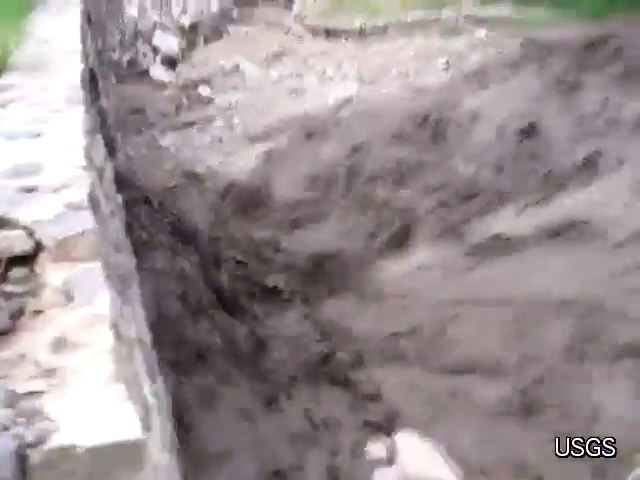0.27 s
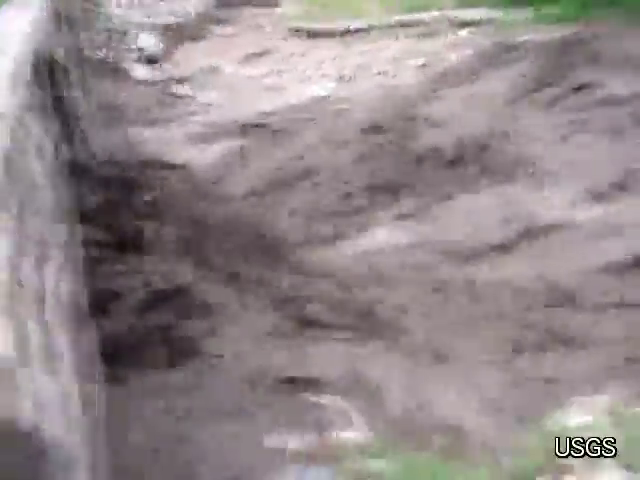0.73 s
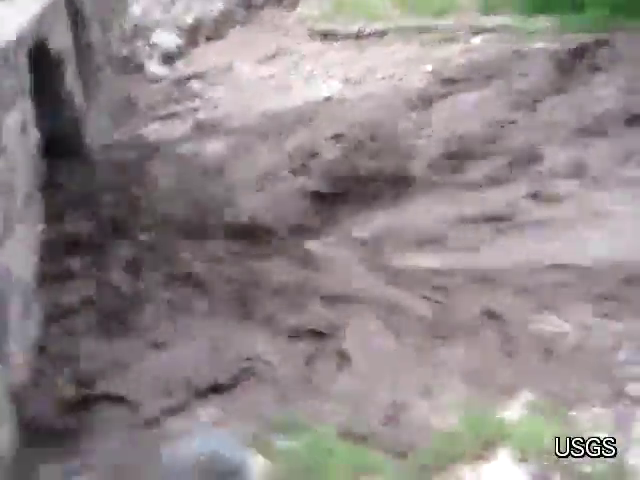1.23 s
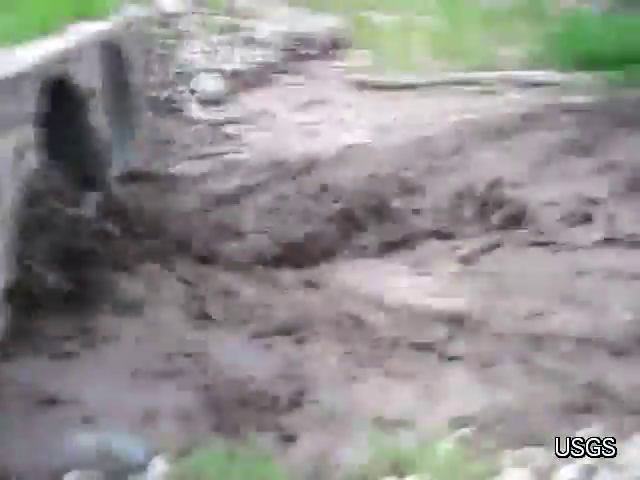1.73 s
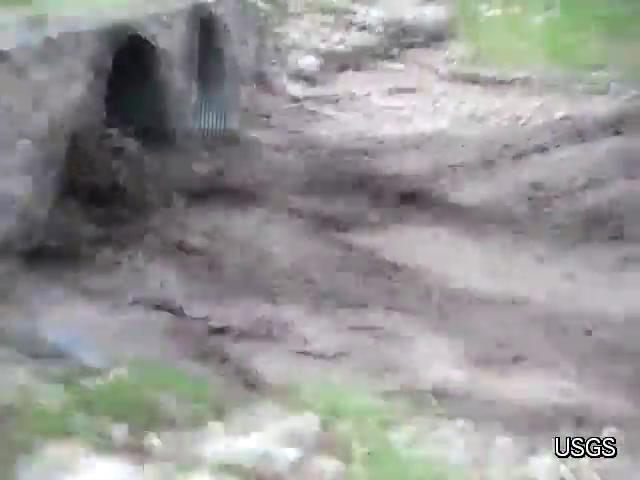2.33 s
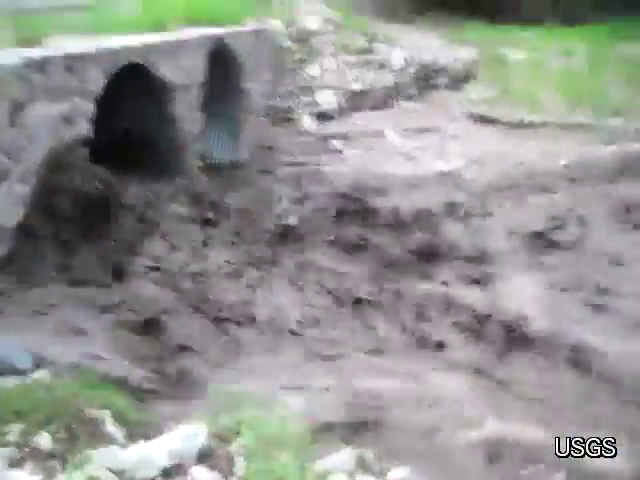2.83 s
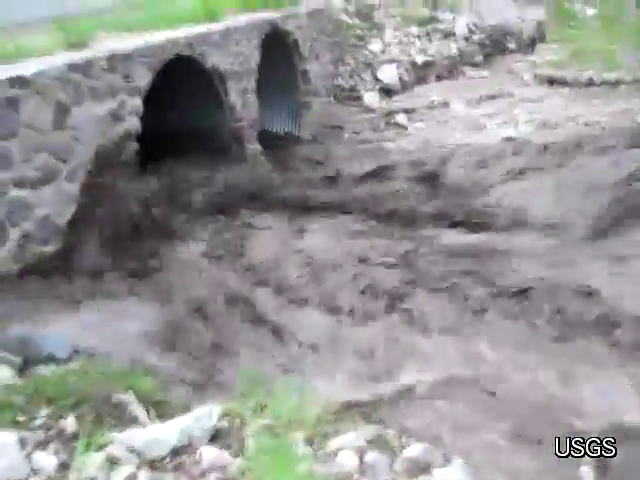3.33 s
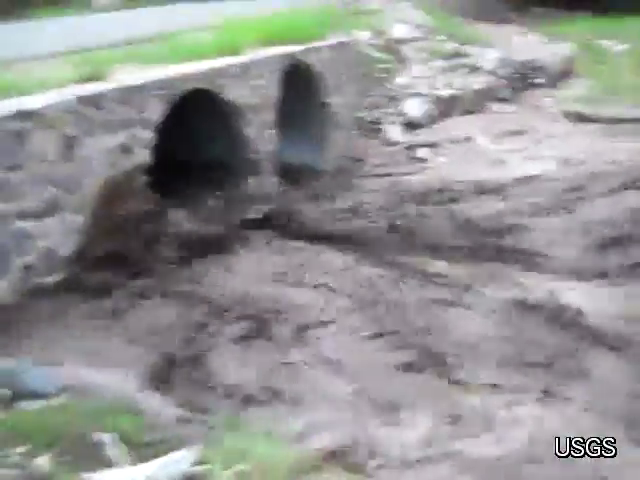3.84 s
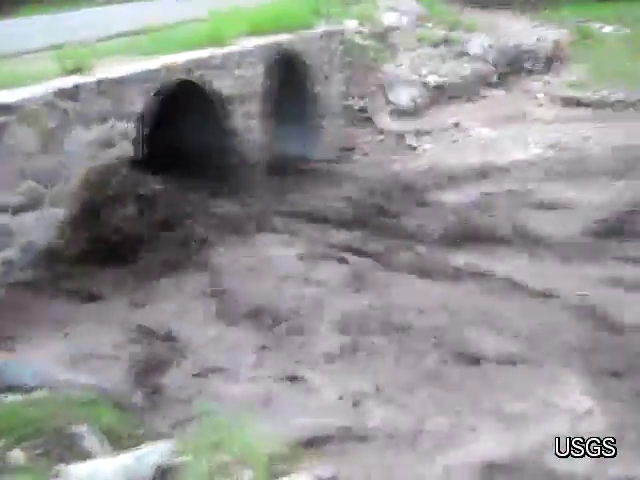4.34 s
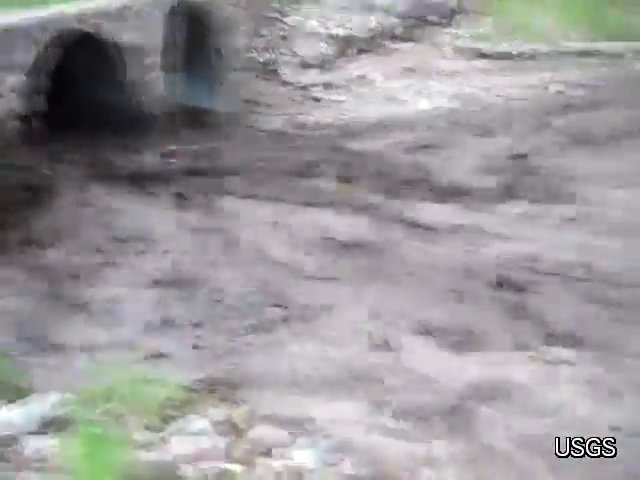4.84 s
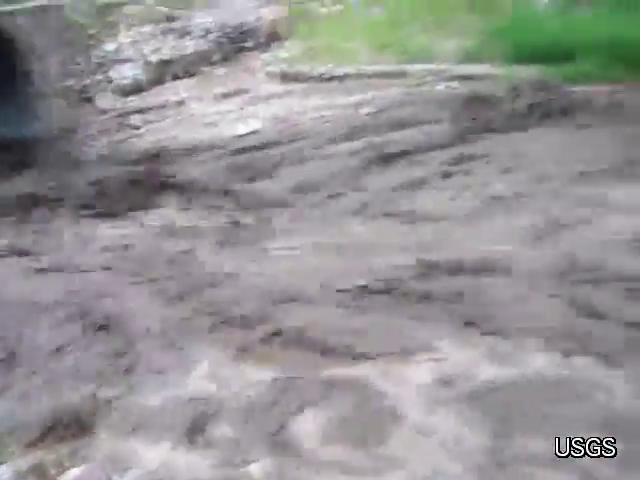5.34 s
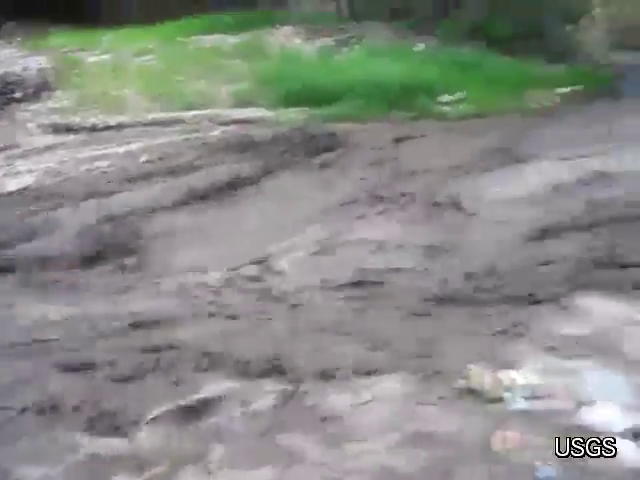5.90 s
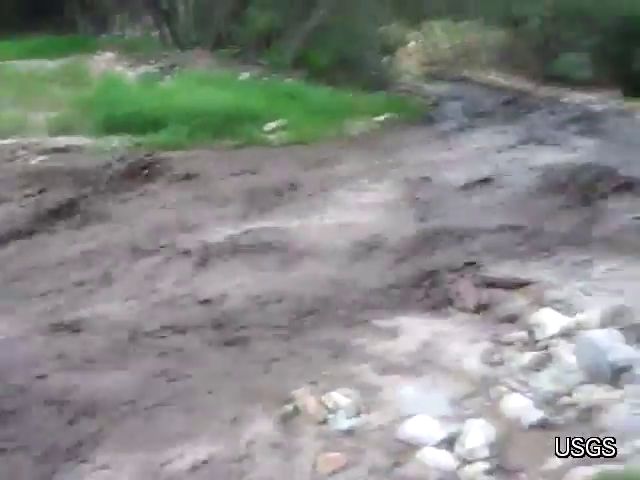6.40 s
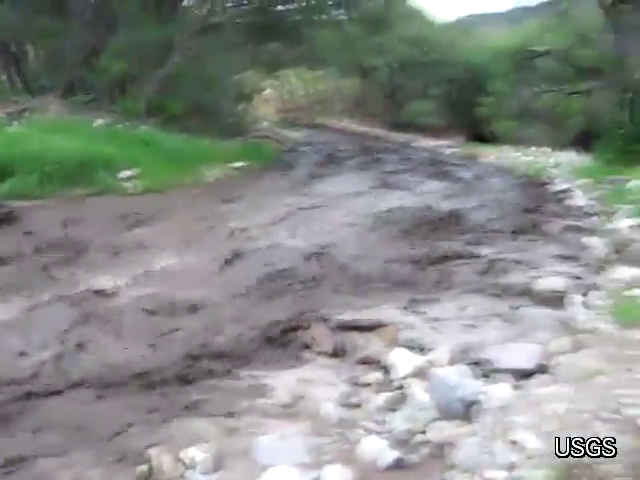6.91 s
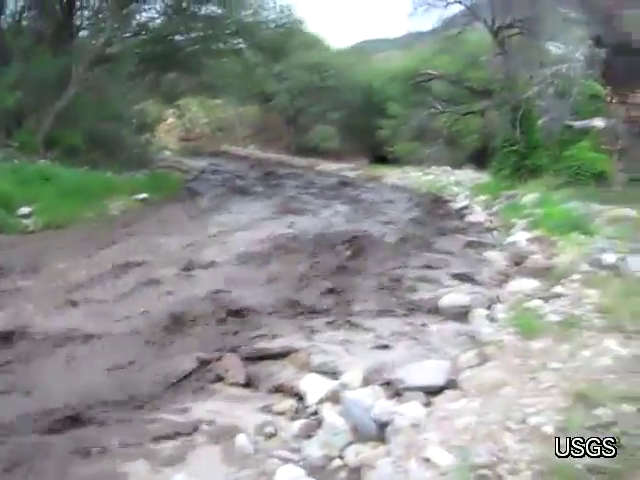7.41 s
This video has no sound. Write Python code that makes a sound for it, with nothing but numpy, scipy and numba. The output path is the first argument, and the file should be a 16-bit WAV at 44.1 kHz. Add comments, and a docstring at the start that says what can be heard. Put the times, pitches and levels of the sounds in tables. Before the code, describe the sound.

A thick, muddy flash flood roars close by past a stone wall, with dull boulder thumps, small glugs and gritty crackle.

```python
"""A thick muddy roar fills the ear at once: a flash flood pouring past a stone wall with culverts.
Half-octave families of random bubble pops and noise make it, from deep roar to hiss and spray.
The wall's echo hollows out two sliding bands, and the culvert mouths ring early on.
Boulders thump as short low rings, air pockets glug as brief tones, flung grit crackles as noise bursts.
A small camera pans downstream; its gain control ducks peaks and its coarse sampling mirrors treble."""
import sys
import numpy as np
from scipy import signal
from scipy.fft import rfft, irfft, next_fast_len
from scipy.io import wavfile
from scipy.ndimage import uniform_filter1d
from numba import njit

SR = 44100
rng = np.random.default_rng(int(sys.argv[2]) if len(sys.argv) > 2 else 0)


def wrap_up_sound(samples):
    """Save the sound to the file named by the first command line argument, as 16-bit audio."""
    columns = np.atleast_2d(samples).T
    # keep every value between -1 and 1, then stretch to whole-number steps
    tamed = np.clip(columns, -1, 1)
    steps = np.round(tamed * 32767).astype(np.int16)
    wavfile.write(sys.argv[1], SR, steps)


N = 337806  # samples

# tone colour of the torrent: f/Hz, relative level per Hz/dB
WATER_COLOUR = [(18, -49.5), (30, -25.5), (60, -11.5), (95, -3.5), (130, -1), (180, 0.5), (258, -1),
                (447, -6), (655, -6), (870, -10), (1010, -10.5), (1140, -13), (2000, -16), (3100, -18),
                (3600, -19), (4130, -21), (4770, -24.5), (5400, -30), (6200, -47.5), (20000, -120)]
# borders of the registers wind, deep, rumble, body, roar, wash, splash, hiss, spray: f/Hz
REGISTER_EDGES = (70, 140, 220, 400, 600, 850, 1200, 3500)
# slow level of the lower registers, each about its own mean:
# t/s, wind buffeting level/dB, rumble level/dB, body level/dB, roar level/dB, wash level/dB, splash level/dB
LOW_LEVELS = [(0, 0, 0.5, -0.5, 0, 1, 0), (.5, -1.5, -2, 0.5, -2.5, -1, -1),
              (.9, 0.5, -2.5, -2, -1.5, -0.5, -1), (1.5, -3, -2, 0.5, -3, 0.5, 1),
              (2.0, -2, 1, 0.5, -2.5, -1, -1.5), (2.5, -1.5, 1.5, 0.5, -0.5, 1, -1),
              (2.9, -2.5, -2.5, -2.5, 1, 1, -1.5), (3.8, -2, 0, -1.5, -0.5, 0, 2.5),
              (4.3, -1.5, -0.5, 0.5, 1, 2, -1), (4.8, -0.5, -1, 0.5, 1.5, 0, 0),
              (5.1, -3, -0.5, 0, -1.5, 0, -1), (5.5, 4, 0, 1, 3.5, -0.5, 1.5), (5.9, 0, 1, 0.5, 1, 1, -1),
              (6.3, -1.5, -2, 1.5, 2, 2, 2), (6.7, 2.5, -1.5, 2, 2.5, .5, 3),
              (7.0, 1.5, -2, 2.5, 3.5, 3, 3), (7.3, 5.5, 4.5, 2.5, 4.5, 0, 2.5),
              (7.66, 6, -5, 1, 2, 1, 0.5)]
# slow level of the deepest roar, about its mean: t/s, level/dB
DEEP_LEVEL = [(0, 1.5), (.8, -1), (1.6, -1.5), (2.5, 1), (3.5, -1.5), (4.5, -.5), (5.2, 0), (5.8, .5),
              (6.5, -1), (7.66, 2.5)]
# quick swells and drops of the treble level:
# t/s, change before/dB (negative dips), drop after/dB (negative lifts)
TREBLE_CHANGES = [(0.2, -0.5, -1), (0.65, -1.5, 3), (0.92, 1.5, 6), (1.06, 0.5, -1.5), (1.14, 1, 1.5),
                  (1.46, 1.5, -2.5), (1.63, 0.5, 1.5), (1.745, 2, 3), (2.1, -0.5, 1.5), (2.23, 3.5, 1),
                  (2.44, 0.5, 2.5), (2.56, 4, -1), (2.92, -1, 0), (3.06, 3.5, 5.5), (3.25, 1.5, 1),
                  (3.7, 1, 6), (3.88, 1, 9), (4.12, 1.5, 3.5), (4.43, 1, 3.5), (4.64, 3.5, 2), (5.19, 1, 1),
                  (5.26, 2, 2), (5.61, 1, 3.5), (5.73, 0, -2), (5.85, 4.5, 2.5), (6.14, 3, 5), (6.33, 3, 0),
                  (6.58, 1, 4), (6.8, -2, 0.5), (7.28, -1.5, 4.5), (7.52, 2.5, 1.5)]
# bands the wall's echo cancels: t/s, lower f/Hz, lower depth/0-1, upper f/Hz, upper depth/0-1
WALL_DIPS = [(0, 230, 0.4, 880, .75), (.2, 242, 0.35, 920, 0.5), (.6, 260, 0.55, 1010, 0.25),
             (.85, 430, .3, 1100, 0.3), (1.2, 507, 0.43, 1130, 0.4), (1.5, 537, 0.6, 1050, 0),
             (1.9, 510, 0.6, 1010, 0.1), (2.1, 400, 0.74, 1050, 0.2), (2.35, 440, 0.33, 1050, .2),
             (2.55, 470, 0.7, 1050, .2), (2.85, 500, 0.56, 1000, 0), (3.1, 406, .25, 890, 0.4),
             (3.9, 360, 0.14, 880, 0.5), (4.2, 330, .3, 850, 0.3), (4.9, 230, 0.3, 800, 0.2),
             (5.2, 130, 0.28, 800, 0), (5.5, 130, 0, 800, 0.1)]
# boulder thumps at set times: t/s, peak level/dB, f/Hz
TIMED_THUMPS = [(0.19, -15.5, 188), (0.648, -14, 217), (1.051, -19, 199), (1.294, -14, 187),
                (1.363, -14.5, 178), (1.494, -16, 258), (1.611, -11, 228), (1.717, -13, 144),
                (1.908, -14.5, 240), (2.096, -13, 208), (2.373, -14.5, 170), (2.782, -17, 140),
                (2.932, -10.5, 211), (3.006, -18, 250), (3.318, -19, 252), (3.59, -19, 249),
                (3.27, -18.5, 204), (3.69, -17, 190), (4.226, -17, 146), (4.691, -18, 148),
                (4.705, -19, 240), (4.877, -15, 156), (5.205, -17, 217), (5.268, -13, 188),
                (5.35, -14.5, 201), (5.411, -27, 197), (5.465, -14, 254), (5.53, -14.5, 185),
                (5.585, -20, 215), (5.749, -12, 192), (5.846, -11.5, 175), (5.998, -19, 190),
                (6.12, -15, 140), (6.16, -14, 191), (6.366, -13.5, 158), (6.592, -14, 170),
                (6.96, -17, 260), (6.996, -15, 190), (7.228, -20, 205), (7.29, -13, 170), (7.392, -13, 258),
                (7.51, -11.5, 210)]
# glugs of trapped air: t/s, peak level/dB, f/Hz, length/s, pitch rise/share of f (negative falls)
AIR_GLUGS = [(0.025, -24, 542, 0.036, 0.047), (0.304, -21.5, 707, .04, 0.005),
             (0.624, -24, 602, .035, 0.13), (0.786, -25, 921, 0.05, 0.034), (0.89, -28, 978, 0.12, 0.033),
             (1.035, -23, 331, 0.056, 0.041), (1.075, -27, 709, .07, 0.22), (2.089, -23, 597, 0.027, 0.085),
             (2.545, -23.5, 766, 0.037, 0.067), (3.948, -24.5, 400, .035, .03),
             (3.555, -19.5, 514, 0.037, 0.0022), (5.14, -18.5, 560, 0.031, .03),
             (5.6, -17.5, 532, 0.025, 0.12), (5.393, -20.5, 352, 0.056, 0.086),
             (6.011, -25, 944, 0.052, .03), (6.257, -25, 1050, .05, -0.025), (6.471, -26, 583, .035, .03),
             (6.69, -22.5, 542, 0.044, 0.01), (6.85, -18.5, 474, 0.047, .03), (7.15, -25, 501, .05, 0.021),
             (7.582, -26, 569, 0.034, 0.046)]
# playback smoothing, loose enough to pass mirrored treble: f/Hz, level/dB
PLAYBACK_SMOOTHING = [(5000, 0), (5500, -1.5), (6000, -7), (6500, -14), (7880, -31.5), (9090, -48.5),
                      (10000, -63.5), (10800, -90), (20000, -130)]

WATER_DB = -21  # torrent level before its slow levels
CHURN_DB, CHURN_PER_S = 0.52, 9  # the whole torrent heaves together
BEFORE_S, SWITCH_S, AFTER_S = 0.055, 0.014, 0.029  # time constants of the quick treble changes
# turning downstream, away from the wall: the hiss lifts and the spray dulls by this much at full turn
TURN_FROM_S, TURN_TO_S, TURN_HISS_DB, TURN_SPRAY_DB = 4.3, 9.3, 0.4, -0.5
LOWER_DIP_WIDTH_HZ, UPPER_DIP_WIDTH_HZ = 156.0, 110.0
CULVERT_HZ, CULVERT_WIDTH_HZ = 690.0, 220.0
CULVERT_RING, CULVERT_UNTIL_S, CULVERT_FADE_S = 0.14, 2.5, 0.1  # ring share while the mouths are faced
THUMP_T60_S, THUMP_RISE_S = 0.034, 0.013
# further thumps at random times
RANDOM_THUMP_DB, RANDOM_SCATTER_DB, RANDOM_LOW_HZ, RANDOM_HIGH_HZ = -20, 4, 153.4, 273
GLUG_LATE = 1.34  # above 1 the tone is loudest late in its length
CRACKLE_DB, CRACKLE_PER_S, CRACKLE_SCATTER_DB, CRACKLE_DECAY_S = -40, 260, 2.5, 0.0015
CRACKLE_HZ, CRACKLE_WIDTH_HZ = 2690.0, 2330.0
AGC_INPUT_DB, AGC_TOP, AGC_RATIO = 1.5, 0.18, 3.3  # input gain, threshold amplitude, compression ratio
AGC_ATTACK_S, AGC_RELEASE_S = 0.0029, 0.072
CEILING, OFFSET = 0.94, -0.0151  # full-scale amplitudes
SAMPLE_STEP, TOP_HZ = 4, 11000  # the camera keeps every fourth sample


def water():
    """Half-octave families of bubbles; the treble wavers together and each family flickers alone."""
    quick_db = treble_changes()
    wind_db, rumble_db, body_db, roar_db, wash_db, splash_db = curve(LOW_LEVELS)
    deep_db = curve(DEEP_LEVEL)[0]
    turn = np.interp(np.arange(N) / SR, [TURN_FROM_S, TURN_TO_S], [0, 1])

    size = next_fast_len(N)
    octave = np.log2(np.maximum(np.arange(size // 2 + 1) * SR / size, 1.0))
    colour_hz, colour_db = np.transpose(WATER_COLOUR)
    colour = undb(np.interp(octave, np.log2(colour_hz), colour_db))

    registers = np.zeros((len(REGISTER_EDGES) + 1, N))
    treble_waver = walk(32)
    churn_db = CHURN_DB * walk(CHURN_PER_S)
    for centre in np.arange(4.5, 14, 0.5):  # octaves above 1 Hz
        hz = 2 ** centre
        share = np.cos(np.pi * np.clip(octave - centre, -0.5, 0.5))
        band = irfft(rfft(bubbles(hz), size) * share * colour, size)[:N]
        # spray is lighter than mud: the treble wavers more
        flicker_db = 0.58 * min(hz / 2500, 1) * treble_waver + 0.5 * walk(16) + churn_db
        registers[np.searchsorted(REGISTER_EDGES, hz)] += band * undb(flicker_db)

    # the quick treble changes also move the splash and spray, and the roar and wash in part
    level_db = (
        wind_db,
        deep_db,
        rumble_db,
        body_db,
        roar_db + 0.44 * quick_db,
        wash_db + 0.37 * quick_db,
        splash_db + 1.3 * quick_db,
        TURN_HISS_DB * turn + quick_db,
        TURN_SPRAY_DB * turn + 0.85 * quick_db,
    )
    torrent = sum(register * undb(db - db.mean()) for register, db in zip(registers, level_db))
    return torrent * undb(WATER_DB) / registers.sum(0).std()


def bubbles(centre_hz, pops_per_cycle=0.45, scatter_db=2.5, smooth=0.7):
    """Bubbles of one size: random pops of uneven strength over a blur of distant ones."""
    pop = rng.random(N) < np.clip(pops_per_cycle * centre_hz / SR, 0, 1)
    # no pop stands far out of the torrent
    strength = np.minimum(rng.exponential(size=N), 2.5)
    pops = pop * rng.choice([-1.0, 1.0], N) * undb(scatter_db * strength)
    blur = rng.standard_normal(N)
    return np.sqrt(smooth) * blur + np.sqrt(1 - smooth) * unit(pops)


def treble_changes():
    """Quick treble level in dB: it swells or dips up to each set time, then drops or lifts and settles."""
    s, before_db, drop_db = np.transpose(TREBLE_CHANGES)[:, :, None]
    step = 64  # samples between computed levels
    t = np.arange(0, N + step, step) / SR - s
    passed = 0.5 + 0.5 * np.tanh(np.clip(t / SWITCH_S, -20, 20))
    before = before_db * (1 - passed) * np.exp(-np.abs(t) / BEFORE_S)
    drop = drop_db * passed * np.exp(-np.abs(t) / AFTER_S)
    return np.interp(np.arange(N), np.arange(t.shape[1]) * step, (before - drop).sum(0))


def wall_echo(x):
    """The stone wall's echo cancels two bands that slide as the camera moves; culvert mouths ring."""
    lower_hz, lower_depth, upper_hz, upper_depth = curve(WALL_DIPS)
    faced = 0.5 - 0.5 * np.tanh((np.arange(N) / SR - CULVERT_UNTIL_S) / CULVERT_FADE_S)
    culvert = svf(x, np.full(N, CULVERT_HZ), CULVERT_WIDTH_HZ)
    x = x - upper_depth * svf(x, upper_hz, UPPER_DIP_WIDTH_HZ)
    x = x - lower_depth * svf(x, lower_hz, LOWER_DIP_WIDTH_HZ)
    return x + CULVERT_RING * faced * culvert


def thumps(count=14):
    """Boulders knocking on the bed: a soft push into a short, low ring."""
    out = np.zeros(N)
    t = np.arange(int(0.12 * SR)) / SR
    push = (1 - np.exp(-t / THUMP_RISE_S)) ** 2
    shape = push * np.exp(-np.log(1000) * t / THUMP_T60_S)
    shape = shape / shape.max()
    when, strength, pitch = rng.random((count, 3)).T
    random_db = RANDOM_THUMP_DB + RANDOM_SCATTER_DB * (2 * strength - 1)
    random_hz = RANDOM_LOW_HZ * (RANDOM_HIGH_HZ / RANDOM_LOW_HZ) ** pitch
    random_thumps = zip(when * N / SR, random_db, random_hz)
    for s, db, hz in list(TIMED_THUMPS) + list(random_thumps):
        i = int(s * SR)
        thump = undb(db) * shape * np.sin(2 * np.pi * hz * t)
        out[i:i + len(t)] += thump[:N - i]
    return out


def glugs():
    """Air pockets near the surface: a swelling and fading tone, its pitch usually rising a little."""
    out = np.zeros(N)
    for s, db, hz, length, rise in AIR_GLUGS:
        u = np.arange(int(length * SR)) / (length * SR)  # 0-1 through the glug
        tone = np.sin(2 * np.pi * hz * length * (u + rise * (u * u - u) / 2))
        swell = np.sin(np.pi * u ** GLUG_LATE)
        i = int(s * SR)
        out[i:i + len(u)] += undb(db) * swell * tone
    return out


def crackle():
    """Flung mud and grit landing: millisecond bursts of band-passed noise, some louder than others."""
    hit = rng.random(N) < CRACKLE_PER_S / SR
    hit = hit * undb(CRACKLE_SCATTER_DB * np.minimum(rng.exponential(size=N), 2))
    decay = np.exp(-1 / (CRACKLE_DECAY_S * SR))
    bursts = signal.lfilter([1], [1, -decay], hit) * rng.standard_normal(N)
    hz = np.full(N, CRACKLE_HZ)
    for _ in range(2):
        bursts = svf(bursts, hz, CRACKLE_WIDTH_HZ)
    return unit(bursts) * undb(CRACKLE_DB)


def undb(db):
    """Decibels to an amplitude factor."""
    return 10 ** (np.asarray(db) / 20)


def unit(x):
    """Scale a signal to an RMS of 1."""
    return x / np.sqrt(np.mean(x ** 2))


def curve(table):
    """Columns of a (t/s, value, ..) table, one value a sample."""
    s, *columns = np.transpose(table)
    return [np.interp(np.arange(N) / SR, s, c) for c in columns]


def walk(rate):
    """Random levels drawn `rate` times a second and smoothed twice into a wander."""
    k = int(SR / rate)
    steps = np.repeat(rng.standard_normal(N // k + 1), k)
    return 0.95 * uniform_filter1d(uniform_filter1d(steps, k), k)[:N]


@njit
def svf(x, hz, width):
    """State-variable band-pass with a moving centre, gain 1 at the centre, width in Hz."""
    y, band, low = np.empty(len(x)), 0.0, 0.0
    for i in range(len(x)):
        g, k = np.tan(np.pi * hz[i] / SR), width / hz[i]
        v = (band + g * (x[i] - low)) / (1 + g * (g + k))
        band, low, y[i] = 2 * v - band, low + 2 * g * v, k * v
    return y


@njit
def follow(x, attack, release, start):
    """Peak follower: quick up, slow down; rates are shares of the gap closed per sample."""
    level, out = start, np.empty(len(x))
    for i in range(len(x)):
        a = abs(x[i])
        level += (a - level) * (attack if a > level else release)
        out[i] = level
    return out


def scene():
    """The torrent coloured by the wall, with thumps, glugs and crackle on top."""
    return (wall_echo(water()) + thumps() + glugs() + crackle())[None]


def record(dry):
    """Gain control ducks peaks and creeps back; the slow converter mirrors treble and sits off zero."""
    x = dry[0] * undb(AGC_INPUT_DB)
    level = follow(x, 1 / (AGC_ATTACK_S * SR), 1 / (AGC_RELEASE_S * SR), AGC_TOP)
    x = x * np.minimum(AGC_TOP / level, 1) ** (1 - 1 / AGC_RATIO)
    x = CEILING * np.tanh(x / CEILING)  # the preamp rounds the tallest peaks

    # zeros between the kept samples fold mirror images of the sound into the treble
    kept = x * (np.arange(N) % SAMPLE_STEP == 0) * SAMPLE_STEP
    size = next_fast_len(N)
    hz, db = np.transpose(PLAYBACK_SMOOTHING)
    bin_hz = np.arange(size // 2 + 1) * SR / size
    gain = undb(np.interp(np.log(bin_hz + 1), np.log(hz), db))
    x = irfft(rfft(kept, size) * gain, size)[:N]

    top_cut = signal.ellip(8, 0.2, 70, TOP_HZ, fs=SR, output="sos")
    return signal.sosfilt(top_cut, x)[None] + OFFSET


dry = scene()
out = record(dry)
wrap_up_sound(out)
```